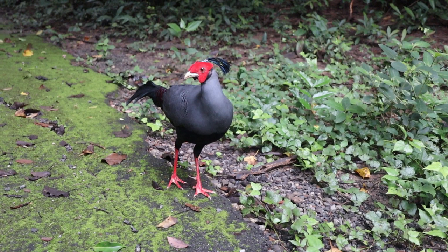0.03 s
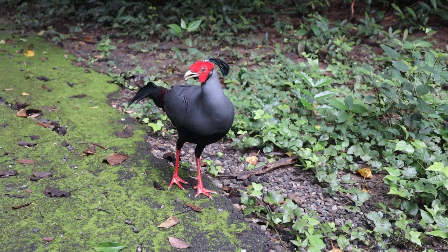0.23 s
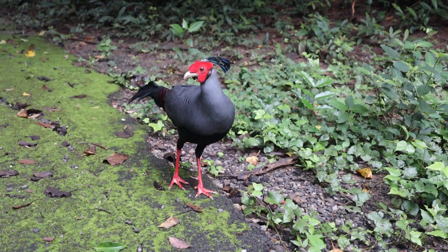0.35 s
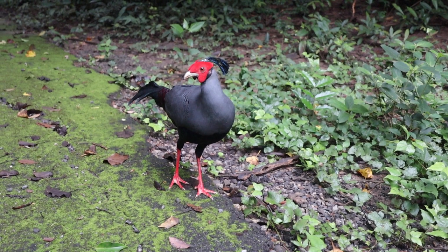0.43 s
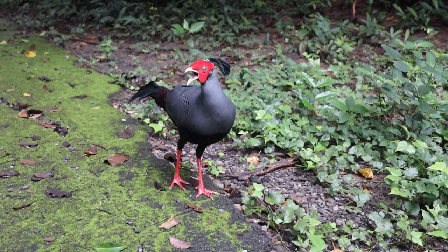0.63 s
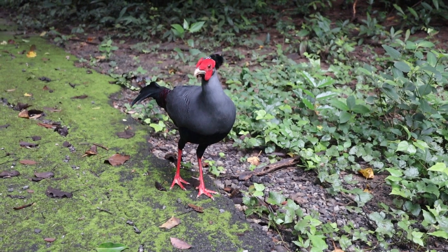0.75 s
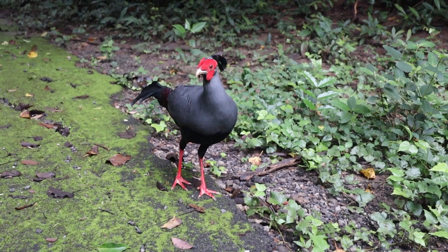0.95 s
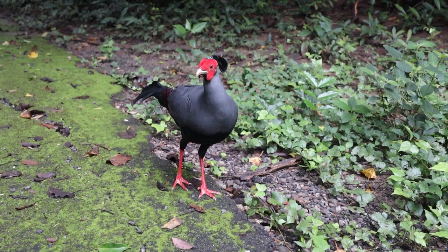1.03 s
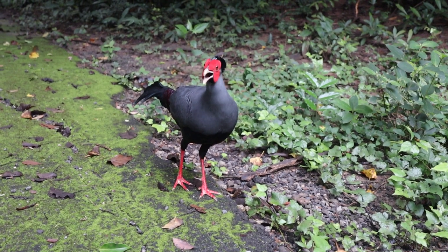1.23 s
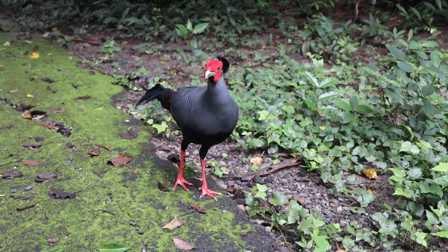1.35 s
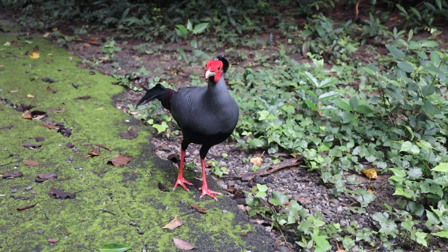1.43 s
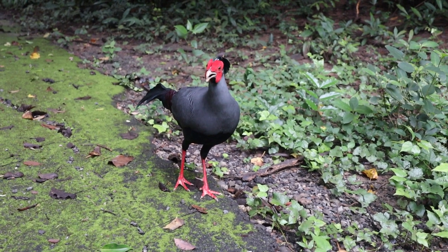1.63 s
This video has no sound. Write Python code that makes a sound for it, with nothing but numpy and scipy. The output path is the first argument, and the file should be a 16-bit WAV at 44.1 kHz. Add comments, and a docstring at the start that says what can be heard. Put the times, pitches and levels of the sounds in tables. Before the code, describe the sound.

Close by, a pheasant clucks twice, then calls one nasal note over faint outdoor hiss.

```python
"""A pheasant calls three times on a path at the edge of a wood, close to a stereo microphone.
Its voice box buzzes, and its throat and beak shape the buzz into two short clucks and a longer nasal note.
Each cluck turns rough, then breaks into a thin whistle that plunges in pitch.
Ground and plants echo the calls, and the trees return a soft tail.
Behind it all are a low outdoor rumble, a faint hiss and one soft bump."""
import sys
import numpy as np
from scipy import signal
from scipy.fft import rfft, irfft
from scipy.io import wavfile
from scipy.ndimage import uniform_filter1d

SR = 44100
rng = np.random.default_rng(int(sys.argv[2]) if len(sys.argv) > 2 else 0)


def pcm_store(signal):
    """Save signal as 16-bit PCM."""
    levels = np.round(np.clip(np.atleast_2d(signal), -1, 1) * 32767)
    wavfile.write(sys.argv[1], SR, levels.astype(np.int16).T)


N = 74970

# Pitch and loudness of each cluck, one list per cluck: t/s, f/Hz, level/dB
CLUCK_CURVES = [
    [(.204, 444.3, -30.5), (.217, 472.3, -16), (.227, 470.5, -5), (.238, 456.7, -1.5), (.252, 478.7, 0),
     (.271, 514, -1), (.279, 493, -3.5), (.287, 457, -2), (.292, 406, -2), (.296, 361, -6),
     (.301, 350, -15), (.307, 350, -25)],
    [(.640, 423, -26.5), (.652, 435, -15), (.666, 447, -4), (.684, 488.3, 0), (.697, 531, -1),
     (.706, 554, -2.5), (.712, 518, -2), (.721, 545, -1.5), (.726, 503, -3), (.730, 415, -3),
     (.734, 380, -4), (.739, 348, -15.5), (.745, 350, -13.5)],
]
# How throat and beak colour a cluck: f/Hz, level/dB, left minus right/dB
CLUCK_COLOUR = [(248, -1.5, -9), (409, -20, -1), (497, -15, -4.5), (730, -18.5, 1), (942, -28.5, -1),
                (1048, -20, -5), (1330, -16.5, 3), (1520, -26, -6.5), (1790, -16, -9.5), (1837, -8.5, -0.5),
                (2197, -4.5, 5), (2350, -11.5, 2.5), (2475, -16.5, -0.5), (2710, -34.5, -2.5),
                (2960, -13.5, -4.5), (3240, -15.5, -2.5), (3480, -24.5, -0.5), (3920, -25, 4),
                (4570, -36.5, 5), (5250, -30.5, -6.5), (6300, -33, -5), (7220, -35.5, -7.5),
                (8200, -47.5, -8.5), (12000, -67, 3.5)]
# How far a cluck's wave is ahead in the left channel: f/Hz, lead/rad
CLUCK_LEAD = [(490, 0), (1050, 0.8), (2100, 0.1), (2500, -1.2), (3100, -0.6), (3950, -0.9), (4500, -1.5),
              (5340, -2), (6370, -1), (8180, -2.5)]


def clucks():
    """Two short calls that turn rough as their pitch falls at the end."""
    return [voice(curve, CLUCK_COLOUR, CLUCK_LEAD, jitter=0.0081, shimmer=0.024,
                  half_db=-19.5, rasp_db=1, creak=True) for curve in CLUCK_CURVES]


# Pitch and loudness of the long note: t/s, f/Hz, level/dB
LONG_CURVE = [(1.218, 417.4, -24), (1.235, 432.7, -8), (1.249, 411.4, -1), (1.268, 404.5, 0),
              (1.287, 406, 0), (1.316, 415.4, 0), (1.358, 418, -0.5), (1.387, 408.3, -1),
              (1.402, 380.8, -2), (1.412, 346, -6.5), (1.419, 291, -22.5), (1.431, 224, -26)]
# How the throat and wide-open beak colour it: f/Hz, level/dB, left minus right/dB
LONG_COLOUR = [(263, -10, 0.5), (405, -24.5, 0), (790, -25, 2), (1240, -25, 0.5), (1626, -27.5, 4.5),
               (2080, -9.5, 3.5), (2280, -10.5, 1), (2514, -27.5, 5), (2890, -15, -2), (3290, -27, 0),
               (3440, -43.5, -9), (3730, -25.5, 2), (4390, -47.5, -2.5), (4850, -26.5, 4), (5360, -45, -10),
               (5750, -32.5, -9.5), (6900, -37.5, -3.5), (7850, -45, -3.5), (9080, -53, -7.5),
               (10600, -71.5, 0), (11450, -56, 3), (13000, -71, -6)]
# How far its wave is ahead in the left channel: f/Hz, lead/rad
LONG_LEAD = [(410, -.5), (830, -0.23), (1250, -.5), (1660, -1.2), (2086, -0.4), (2500, -2), (2910, -0.5),
             (3750, 0.55), (4740, -1.2), (6030, -2), (6460, -0.84), (8180, -2.5)]


def long_note():
    """A smoother, nasal call that holds its pitch, then drops away."""
    return voice(LONG_CURVE, LONG_COLOUR, LONG_LEAD, jitter=0.001, shimmer=0.007,
                 half_db=-19, rasp_db=-4.5, creak=False)


TREMBLE_HZ = 350
CREAK_S, CREAK_JITTER, CREAK_HALF_DB = 0.022, 0.035, 13.5
DULLING, DULL_HZ = 1.84, 1760  # extra dB lost from this frequency up, for each dB the voice softens
THIN_AT_S, THIN_WIDTH_S, THIN_DB = 1.348, 0.031, -6


def voice(curve, throat, leads, jitter, shimmer, half_db, rasp_db, creak):
    """The voice box buzzes and rasps through the throat. Jitter shakes the pitch, shimmer the level."""
    times, pitches, levels = np.transpose(curve)
    t = np.arange(times[0], times[-1], 1 / SR)
    rough = creak * np.exp(-((t[-1] - t) / CREAK_S) ** 4)
    hz = uniform_filter1d(np.interp(t, times, pitches), size=200)
    hz *= 1 + (jitter + CREAK_JITTER * rough) * wander(len(t), TREMBLE_HZ)
    level_db = np.interp(t, times, levels)
    dull_db = DULLING * np.minimum(level_db, 0)
    phase = 2 * np.pi * np.cumsum(hz) / SR
    buzz = np.zeros((2, len(t)))
    for k in np.arange(1, 30, 0.5):  # each tone is at k times the pitch
        db, pan_db = look_up(throat, k * hz)
        db += dull_db * np.minimum((k - 1) * hz / DULL_HZ, 1)
        if k == 1:  # the lowest tone dips past the middle of the long note
            db += THIN_DB * np.exp(-((t - THIN_AT_S) / THIN_WIDTH_S) ** 2)
        if k % 1:  # weak tones halfway between the harmonics sound rough
            bass_cut_db = 9 * np.log2(np.minimum(k * hz / 5000, 1))
            bass_cut_db += 16 * np.log2(np.minimum(k * hz / 2000, 1))
            db += half_db + CREAK_HALF_DB * rough + bass_cut_db
        smear = 0.42 * k * k  # keeps the tones from all peaking together
        buzz += stereo_tone(k * phase - smear, db, pan_db, look_up(leads, k * hz)[0])
    puffs = rng.standard_normal((2, N))
    puffs[:, :len(t)] *= (1 + np.cos(phase)) * amp(dull_db)  # one puff of noise per vibration
    f = np.fft.rfftfreq(N, 1 / SR)
    rasp_colour = amp(look_up(throat, f)[0] + rasp_db) * f ** 2 / (f ** 2 + 3500 ** 2)
    rasp = irfft(rfft(puffs) * rasp_colour, N)[:, :len(t)]
    fade = np.clip(np.minimum(t - t[0], t[-1] - t) / 0.003, 0, 1)
    flutter = 1 + shimmer * wander(len(t), TREMBLE_HZ)
    return times[0], (buzz + rasp) * amp(level_db) * fade * flutter


# The whistles: start t/s, mid-plunge t/s, top f/Hz, plunge time/s, level/dB, gain into the wood/dB
WHISTLE_PLUNGES = [(0.297, 0.3181, 7724, 0.004, 1, 4.5), (0.738, 0.7597, 7390, .0038, 1, 1)]
# How the throat colours a whistle: f/Hz, level/dB, left minus right/dB
WHISTLE_COLOUR = [(1000, -27, -6), (1504, -30.5, 1), (1800, -14.5, -4), (2120, -5.5, 3),
                  (2580, -15.5, -7.5), (3330, -30, -8), (3750, -22, 3.5), (4234, -9, 10), (4630, -15, -2),
                  (5130, -6.5, -3), (5550, -13, -8), (6100, -7, -4), (6600, -12, -9), (7160, -12.5, -5),
                  (7720, -19.5, -2)]
# Throat tones that ring on after the plunge: f/Hz, width/Hz, gain
THROAT_RINGS = [(2140, 150, 1.4), (4900, 370, 0.87)]
# Burst of hissing air around the plunge: f/Hz, level/dB
HISS_COLOUR = [(1000, -43), (6500, -21), (9000, -32.5), (14000, -41.5), (17000, -62)]
WHISTLE_END_HZ, WHISTLE_S, RIGHT_EARLY_S = 1004, 0.042, 0.00005
FADE_IN_S, FADE_OUT_S, HISS_S = 0.0017, 0.008, 0.0058


def whistle(start, middle, top_hz, plunge_s, level_db):
    """A pure tone hangs high, then plunges and sets the throat ringing; air hisses with it."""
    t = np.arange(0, WHISTLE_S, 1 / SR)
    from_middle = start + t - middle
    hz = WHISTLE_END_HZ + (top_hz - WHISTLE_END_HZ) / (1 + np.exp(from_middle / plunge_s))
    hz *= 1 + 0.006 * wander(len(t), TREMBLE_HZ)
    phase = 2 * np.pi * np.cumsum(hz) / SR
    db, pan_db = look_up(WHISTLE_COLOUR, hz)
    tone = stereo_tone(phase, db, pan_db, lead=-2 * np.pi * hz * RIGHT_EARLY_S)
    ring = sum(gain * signal.lfilter(*signal.iirpeak(f, f / width, fs=SR), tone)
               for f, width, gain in THROAT_RINGS)
    colour = amp(look_up(HISS_COLOUR, np.fft.rfftfreq(N, 1 / SR))[0])
    hiss = irfft(rfft(rng.standard_normal((2, N))) * colour, N)[:, :len(t)]
    hiss *= np.exp(-abs(from_middle) / HISS_S)
    fade = np.clip(np.minimum(t / FADE_IN_S, (WHISTLE_S - t) / FADE_OUT_S), 0, 1)
    return start, (tone + ring + hiss) * amp(level_db) * fade


# Bounces off the ground and nearby plants: delay/s, left level/dB, right level/dB
NEAR_BOUNCES = [(.0046, -37, -37.5), (0.0107, -19.5, -24)]


def near_echoes(bird):
    """Ground and plants send back two quick, quiet copies of each call."""
    out = np.zeros((2, N))
    for delay, left_db, right_db in NEAR_BOUNCES:
        add(out, delay, bird * amp([[left_db], [right_db]]))
    return out


# The tail from the trees: f/Hz, level/dB, time to fade by 60 dB/s
TREE_TAIL = [(200, -29.5, 0.52), (490, -17, 0.6), (800, -25, .5), (1600, -16.5, 0.67), (2150, -22.5, .55),
             (3300, -23.5, 0.79), (4800, -16.5, 0.76), (7430, -24.5, 0.66), (8500, -31.5, 0.36)]
TAIL_RISE_S, THICKET_AT_S, THICKET_WIDTH_S, THICKET_DB = 0.0082, 0.064, 0.015, 6
LEAVES_DB, LEAVES_S = -11.5, 0.0037
BLUR_RAD, BLUR_HZ = 0.7, 50.1


def wood_echo(calls):
    """Close leaves scatter the calls; the trees add a tail that swells where the thicket answers."""
    hz, t, spectra = signal.stft(rng.standard_normal((2, SR)), SR, nperseg=256)
    db, fade_s = look_up(TREE_TAIL, hz[:, None])
    even_energy = np.sqrt(2 * np.log(1000) / fade_s / SR)  # a longer fade adds no energy
    spectra *= amp(db - 60 * t / fade_s) * even_energy
    tail = signal.istft(spectra, SR, nperseg=256)[1][:, :SR]
    t = np.arange(SR) / SR
    tail *= np.minimum(t / TAIL_RISE_S, 1) ** 2
    tail *= amp(THICKET_DB * np.exp(-((t - THICKET_AT_S) / THICKET_WIDTH_S) ** 2))
    leaves = rng.standard_normal((2, SR)) * t * np.exp(-t / LEAVES_S)
    tail += amp(LEAVES_DB) * leaves / np.linalg.norm(leaves[0])
    echo = signal.fftconvolve(calls, tail, axes=1)[:, :N]
    drift = BLUR_RAD * np.array([wander(N, BLUR_HZ), wander(N, BLUR_HZ)])
    blurred = (signal.hilbert(echo) * np.exp(1j * drift)).real  # drifting phase blurs the tones
    return all_around(signal.stft(blurred, nperseg=1024, noverlap=768)[2])


# How alike the two channels are (1 the same, 0 unrelated, -1 opposite): f/Hz, likeness
STEREO_LIKENESS = [(60, 1), (120, 0.96), (240, 0.84), (490, 0.37), (980, -0.0041), (1970, -0.35),
                   (3960, -0.43), (7970, -0.58)]


def all_around(spectra):
    """Blends two unrelated channels into sound that seems to come from every side."""
    likeness = look_up(STEREO_LIKENESS, np.fft.rfftfreq(1024, 1 / SR))[0][:, None]
    mid = (spectra[0] + spectra[1]) * np.sqrt(1 + likeness) / 2
    side = (spectra[0] - spectra[1]) * np.sqrt(1 - likeness) / 2
    return signal.istft(np.array([mid + side, mid - side]), nperseg=1024, noverlap=768)[1][:, :N]


# Colour of the outdoor rumble and hiss: f/Hz, relative level/dB
AIR_COLOUR = [(20, -9.5), (40, -5.5), (68, -2), (125, -3.5), (220, -5), (400, -7.5), (620, -9.5), (780, -8),
              (1250, -14), (1650, -11), (2150, -7), (2700, -10.5), (3800, -15.5), (5100, -17.5),
              (7300, -24.5), (8400, -36), (10000, -39.5), (15000, -50.5), (16500, -77)]
AIR_DB, AIR_FADE_DB_PER_S, AIR_PATCH_DB = -44.5, 3.5, 3


def outdoor_air():
    """Distant rumble and hiss, a little patchy, slowly dying down."""
    draws = rng.standard_normal((N // 256 + 5, 513, 5)).T
    noise = draws[[0, 2]] + 1j * draws[[1, 3]]
    patches = uniform_filter1d(draws[4], size=8, axis=0)  # smooth across frequency
    patches = unit(uniform_filter1d(patches, size=10, axis=1))  # and across time
    colour_db = look_up(AIR_COLOUR, np.fft.rfftfreq(1024, 1 / SR))[0][:, None]
    air = unit(all_around(noise * amp(colour_db + AIR_PATCH_DB * patches)))
    from_middle = (np.arange(N) - N / 2) / SR
    lean_right = amp([[-0.5], [0.5]])
    return air * amp(AIR_DB - AIR_FADE_DB_PER_S * from_middle) * lean_right


def bump(at_s, hz, width_s, db):
    """One faint, dull thud: a low tone that quickly swells and fades."""
    t = np.arange(N) / SR - at_s
    return amp(db) * np.exp(-abs(t) / width_s) * np.sin(2 * np.pi * hz * t)


def amp(db):
    """Turns decibels into a gain to multiply by."""
    return 10 ** (np.asarray(db) / 20)


def unit(x):
    """Scales a signal to an average power of 1."""
    return x / np.sqrt(np.mean(x ** 2) + 1e-20)


def look_up(table, hz):
    """Reads a table's columns at these frequencies, sliding between rows on a log scale."""
    f, *columns = np.transpose(table)
    return [np.interp(np.log(hz + 1), np.log(f + 1), column) for column in columns]


def add(mix, start_s, sound):
    """Mixes a stereo sound in at its start time."""
    part = mix[:, round(start_s * SR):][:, :sound.shape[1]]
    part += sound[:, :part.shape[1]]


def wander(size, hz):
    """A smooth random wobble, mostly slower than hz."""
    f = np.fft.rfftfreq(N, 1 / SR)
    return unit(irfft(rfft(rng.standard_normal(N)) / (1 + (f / hz) ** 2) ** 2, N))[:size]


def stereo_tone(phase, db, pan_db, lead):
    """One pure tone, louder on the left by pan_db and ahead there by lead radians."""
    return np.array([amp(db + side * pan_db / 2) * np.cos(phase + side * lead / 2) for side in (1, -1)])


def scene():
    """The pheasant, its echoes and the background."""
    calls = [(cluck, 0) for cluck in clucks()]  # each call comes with its gain into the wood, in dB
    calls.append((long_note(), -0.5))
    calls += [(whistle(*row), wood_db) for *row, wood_db in WHISTLE_PLUNGES]
    bird, to_wood = np.zeros((2, 2, N))
    for (start, sound), wood_db in calls:
        add(bird, start, sound)
        add(to_wood, start, sound * amp(wood_db))
    echoes = near_echoes(bird) + wood_echo(to_wood)
    return bird + echoes + outdoor_air() + bump(at_s=0.532, hz=78, width_s=0.009, db=-34)


TREBLE_HZ, TREBLE_DB = 8576, -3.5


def record(dry):
    """Peaks are clipped at full scale, then the high treble is turned down a little."""
    clipped = np.clip(dry, -1, 1)
    low = signal.oaconvolve(clipped, signal.firwin(201, TREBLE_HZ, fs=SR)[None], "same")
    return low + amp(TREBLE_DB) * (clipped - low)


dry = scene()
out = record(dry)
pcm_store(out)
```